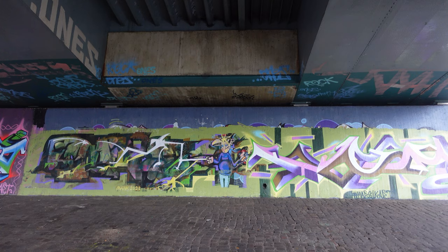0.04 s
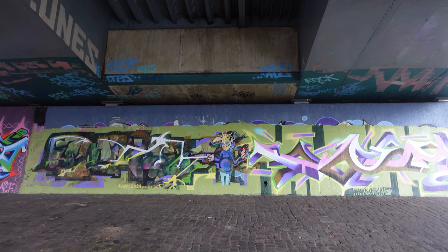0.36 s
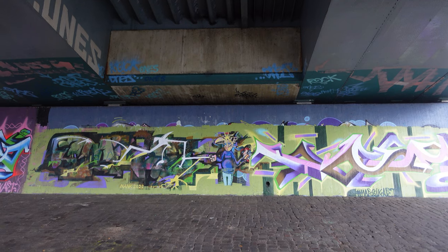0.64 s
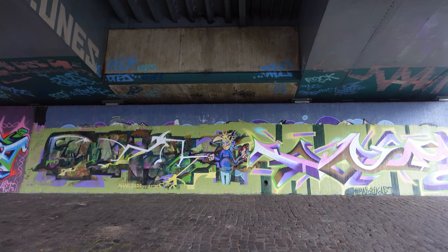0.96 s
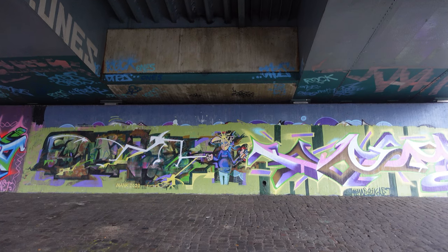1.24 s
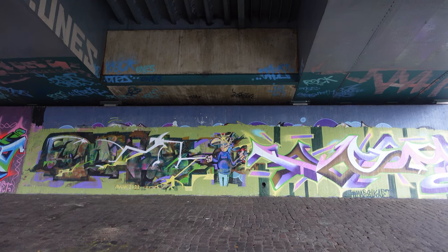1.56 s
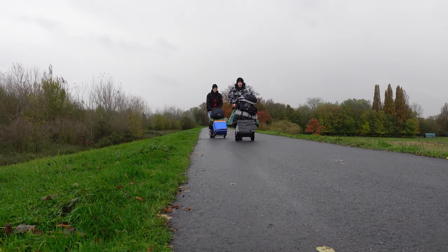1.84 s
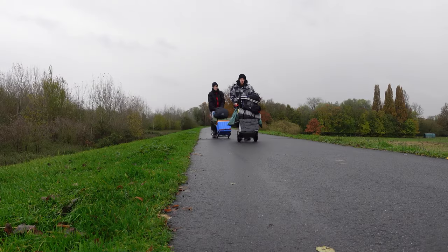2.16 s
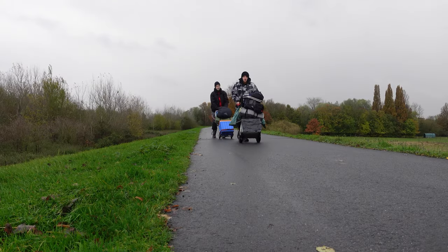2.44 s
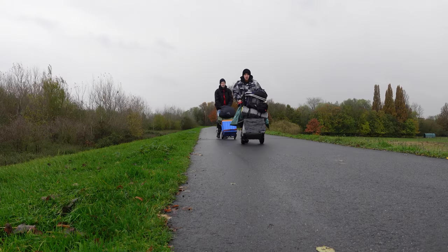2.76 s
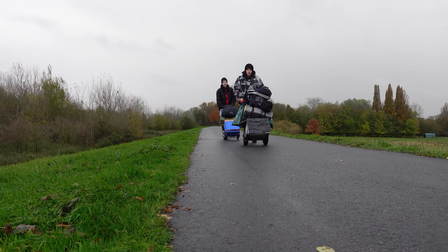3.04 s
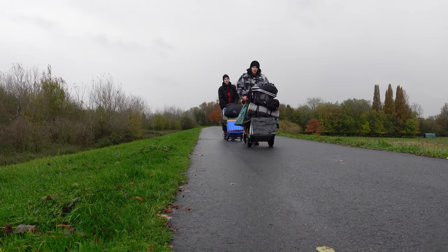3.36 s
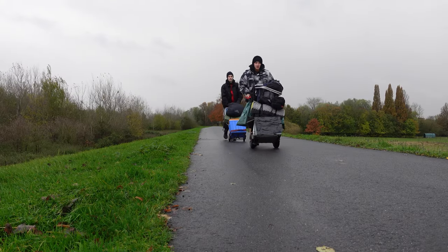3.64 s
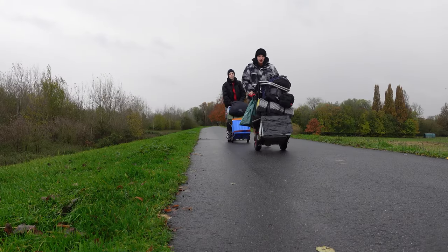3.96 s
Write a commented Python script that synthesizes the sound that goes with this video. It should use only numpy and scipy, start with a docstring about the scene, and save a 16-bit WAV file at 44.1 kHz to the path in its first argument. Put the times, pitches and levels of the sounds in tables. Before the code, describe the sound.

Beneath a road bridge, tyres rumble above and a double thud sets the deck booming, followed by faint high chirps. Then, outdoors and quieter, far traffic hums while rolling carts hiss, crunch grit and rattle once.

```python
"""Under a steel road bridge: tyres roar overhead; axles thud over an expansion joint, which clatters
while the deck booms and rings. A thin high twitter joins in, echoing under the deck.
Cut to an open dyke path: far traffic hums while two loaded carts roll closer. Their wheels hiss
on asphalt, crackle over wet grit and pop single stones; one load rattles once."""
import sys
import numpy as np
from scipy import signal
from scipy.fft import rfft, irfft
from scipy.io import wavfile
from scipy.ndimage import uniform_filter1d, minimum_filter1d

SR = 44100
rng = np.random.default_rng(int(sys.argv[2]) if len(sys.argv) > 2 else 0)


def wrap_up_sound(samples):
    """Save the sound to the file named by the first command line argument, as 16-bit audio."""
    columns = np.atleast_2d(samples).T
    # keep every value between -1 and 1, then stretch to whole-number steps
    tamed = np.clip(columns, -1, 1)
    steps = np.round(tamed * 32767).astype(np.int16)
    wavfile.write(sys.argv[1], SR, steps)


N = 176400
T = np.arange(N) / SR
HZ = np.maximum(np.arange(N // 2 + 1) * SR / N, 1)

# tyre roar, deck rumble over time: t/s, level/dB
ROAR_LEVEL = [(0, -24.5), (.3, -26), (.55, -24), (.78, -23.5), (1.05, -24.5), (1.45, -26), (1.8, -27.5)]
RUMBLE_LEVEL = [(0, -25), (.3, -22), (.58, -25.5), (.7, -21.5), (.9, -26), (1.06, -25), (1.38, -19),
                (1.62, -24.5), (1.8, -20)]
# bridge noise spectra: f/Hz, relative density/dB
ROAR_SPECTRUM = [(210, -40), (350, -9), (490, -1), (1240, -3.5), (1630, -4.5), (2130, -7.5), (2930, -11),
                 (6900, -30.5), (15500, -60.5)]
RUMBLE_SPECTRUM = [(15, -45), (33, -23), (48, -13), (62, -0.5), (100, 4), (150, -0.5), (215, 4.5),
                   (290, -2.5), (400, -7.5), (800, -50), (3000, -100)]
BOOM_SPECTRUM = [(20, -45), (33, -30), (60, -8.5), (100, -7), (150, -7), (185, -0.5), (210, 1.5), (250, -2),
                 (290, -5.5), (330, -4.5), (385, -26), (700, -65), (3000, -100)]
SLAP_SPECTRUM = [(200, -28), (700, 0), (2000, 3.5), (3000, -2.5), (4300, -7), (6500, -15), (10000, -25),
                 (12500, -46), (16000, -50)]
CLATTER_SPECTRUM = [(40, -33), (250, 3), (400, 0), (520, 6.5), (900, 1.5), (1700, 2), (2800, 2.5),
                    (4200, -9), (6500, -17.5), (10000, -30), (12500, -49), (16000, -54)]
RASP_SPECTRUM = [(2000, -38), (3800, -1), (4800, 5), (7500, -14.5), (10000, -17.5), (16000, -42)]
# axles on the joint: t/s, boom/dB, clatter/dB, slap/dB
AXLES = [(-.1, -17.5, -25, -42), (1.106, -15.5, -18.5, -30), (1.236, -16.5, -17.5, -20.5)]
# low swells in the boom: t/s, f/Hz, level/dB
THROBS = [(.024, 220, -12), (0.069, 203.2, -7.5), (1.107, 329.7, -13), (1.149, 251.2, -9.5),
          (1.193, 200, -10.5), (1.275, 245, -12), (1.328, 199, -9), (1.454, 208, -7.5), (1.766, 225, -19.5)]
# ringing steel: f/Hz, relative level/dB
STEEL_MODES = [(202, -9), (311, -8.5), (464, -7), (587, -10.5), (1578, -17), (2304, -19), (2428, -17),
               (2842, -21), (2932, -16.5), (3143, -20), (3543, -23.5)]
# twitter: t/s, length/s, start f/Hz, end f/Hz, level/dB
CHIRPS = [(1.528, .028, 4950, 5000, -34.5), (1.54, 0.017, 4200, 4280, -32.5),
          (1.55, 0.055, 4800, 4700, -33.5), (1.599, 0.06, 4770, 4730, -34.5),
          (1.652, 0.03, 4470, 4280, -34), (1.665, .052, 4750, 4770, -34.5),
          (1.712, 0.023, 4720, 4210, -29.5), (1.74, .048, 5150, 5100, -35.5),
          (1.777, 0.021, 4570, 4200, -32.5)]

# path noise spectra: f/Hz, relative density/dB
HUM_SPECTRUM = [(22, -57), (53, -12.5), (97, -8), (150, -1.5), (253, 0), (333, -5), (608, -8), (717, -3.5),
                (1080, 1), (1280, -4.5), (2600, -9), (4150, -22), (5770, -27), (7590, -34), (9720, -28.5),
                (11500, -33.5), (12800, -45), (15500, -48)]
ROLL_SPECTRUM = [(300, -36), (1400, 2), (2100, -0.5), (3300, -2), (4300, -17.5), (7000, -35), (14000, -60)]
GRIT_SPECTRUM = [(200, -50), (1500, -16), (3200, 9), (4300, 2.5), (5700, 1.5), (7800, -6), (9900, -2),
                 (11300, -13), (12600, -29), (16000, -33)]
KNOCK_SPECTRUM = [(100, -50), (900, -24), (2000, -7), (2900, 7), (4300, 0), (5600, -4.5), (7500, -15.5),
                  (10000, -16), (12500, -49)]
# wheel hiss, fine crackle over time: t/s, level/dB
ROLL_LEVEL = [(1.82, -44), (2.2, -36.5), (2.55, -41), (2.95, -49), (3.4, -50), (4, -42)]
CRACKLE_LEVEL = [(1.82, -54), (2.3, -49.5), (2.6, -49.5), (3.3, -47.5), (4, -43)]
# grit crunches: t/s, length/s, level/dB, high minus low band/dB
CRUNCHES = [(1.869, .0087, -40.5, -1), (2.121, .021, -41, 8), (2.241, 0.036, -40, 5),
            (2.343, 0.026, -42.5, 5), (2.751, 0.0072, -35, -5), (2.783, 0.0075, -40, -8),
            (2.806, 0.045, -43.5, -10), (3.175, 0.014, -37, 4), (3.183, .013, -37, -1),
            (3.193, .036, -43, 0), (3.274, .042, -41.5, 4), (3.619, 0.013, -40, -1), (3.661, .018, -37, -3),
            (3.76, .012, -38.5, 2), (3.792, 0.0083, -37, 5)]
# stone pops: t/s, level/dB
STONE_POPS = [(1.905, -34), (1.913, -35), (1.93, -38), (2.247, -31.5), (2.366, -35), (2.708, -32),
              (2.821, -31), (3.096, -30.5), (3.213, -29), (3.499, -28.5)]
# knocks of the load: t/s, level/dB, T60/s
LOAD_KNOCKS = [(3.881, -23.5, .035), (3.893, -22, 0.031), (3.8982, -21.5, 0.028), (3.907, -23, 0.028),
               (3.914, -19.5, 0.01)]

# stereo widths: f/Hz, side minus mid/dB
BRIDGE_WIDTH = [(60, -39), (180, -24.5), (550, -17), (1650, -14), (4970, -7), (15000, -14)]
JOINT_WIDTH = [(400, -18), (2500, -18), (4500, -12), (10000, -28)]
PATH_WIDTH = [(60, -21), (180, -34), (550, -16), (1650, -19), (4970, -12), (15000, -23)]
CART_WIDTH = [(2500, -30), (5500, -16), (10000, -26)]


def amp(db):
    """Decibels to gain."""
    return 10 ** (np.asarray(db) / 20)


def unit_rms(x):
    """Scale to unit power."""
    return x / np.sqrt(np.mean(x ** 2) + 1e-20)


def level(points):
    """Gain over time from t/s, level/dB."""
    return amp(np.interp(T, *np.transpose(points)))


def gains(points):
    """Gain over frequency from f/Hz, level/dB."""
    hz, db = np.transpose(points)
    return amp(np.interp(np.log(HZ), np.log(hz), db))


def noise(shape, width):
    """Unit-power stereo noise of given spectral shape and width."""
    mid, side = rfft(rng.standard_normal((2, N))) * shape
    side = side * gains(width)
    return unit_rms(irfft(np.array([mid + side, mid - side]), N))


def tone(hz):
    """Sine at random phase."""
    return np.sin(2 * np.pi * (hz * T + rng.random()))


def resonance(hz, half_width_hz):
    """Gain over frequency of one peak."""
    return 1 / (1 + ((HZ - hz) / half_width_hz) ** 2)


def strike(start_s, rise_s, t60_s, hold_s=0):
    """Envelope: linear rise, hold, exponential decay."""
    age_s = T - start_s
    decay_s = np.maximum(age_s - rise_s - hold_s, 0)
    return np.clip(age_s / rise_s, 0, 1) * amp(-60 * decay_s / t60_s)


def swell(start_s, length_s):
    """Short rounded envelope."""
    progress = np.clip((T - start_s) / length_s, 0, 1)
    return 2 * np.sqrt(progress * (1 - progress))


def grains(per_s, spread_db):
    """Random impulses, mostly small, a few large; unit power."""
    sizes = amp(spread_db * np.minimum(rng.exponential(1, N), 4)) * rng.choice([-1, 1], N)
    return unit_rms(sizes * (rng.random(N) < per_s / SR))


def pan(left_minus_right_db):
    """Left and right gains."""
    return amp(np.array([[1], [-1]]) * left_minus_right_db / 2)


def overhead_traffic():
    """Tyre roar and the rumble it drives in the deck."""
    roar = level(ROAR_LEVEL) * noise(gains(ROAR_SPECTRUM), BRIDGE_WIDTH)
    rumble = level(RUMBLE_LEVEL) * noise(gains(RUMBLE_SPECTRUM), BRIDGE_WIDTH)
    return roar + rumble


def deck_boom(rise_s=0.019, lead_s=0.022):
    """Axles set the deck's crowded low modes booming and throbbing; the thud leads the clatter."""
    power = sum((amp(db) * strike(t - lead_s, rise_s, t60_s=1.87, hold_s=0.12)) ** 2
                for t, db, _, _ in AXLES)
    boom = np.sqrt(power) * noise(gains(BOOM_SPECTRUM), BRIDGE_WIDTH)
    throbs = sum(amp(db) * swell(t, length_s=0.039) ** 2 * tone(hz) for t, hz, db in THROBS)
    return boom + throbs


def steel_ring(gain_db=-2.5):
    """Each axle rings a few steel modes, in proportion to its boom."""
    out = 0
    for t, boom_db, _, _ in AXLES:
        modes = sum(amp(db) * tone(hz) for hz, db in STEEL_MODES)
        out = out + amp(boom_db + gain_db) * strike(t, rise_s=0.019, t60_s=1.32) * modes
    return out


def joint_clatter(t60_1khz_s=0.88, t60_exponent=-0.16):
    """Bright slap of tyre on steel, then the joint's clatter, smeared by the concrete vault."""
    slaps = sum(amp(db) * strike(t, rise_s=0.014, t60_s=0.26, hold_s=0.012) for t, _, _, db in AXLES)
    out = slaps * noise(gains(SLAP_SPECTRUM), JOINT_WIDTH)
    clatter_bins = rfft(noise(gains(CLATTER_SPECTRUM), JOINT_WIDTH))
    for octave in range(-3, 5):
        band = np.clip(1 - abs(np.log2(HZ / 1000) - octave), 0, 1)
        t60_s = t60_1khz_s * 2 ** (t60_exponent * octave)   # treble dies first
        power = sum((amp(db) * strike(t, rise_s=0.027, t60_s=t60_s, hold_s=0.023)) ** 2
                    for t, _, db, _ in AXLES)
        out = out + np.sqrt(power) * irfft(clatter_bins * band, N)
    return out


def twitter(wobble_rms_hz=110, rasp_db=-8.5, echo_db=0.5):
    """Short wavering glides, probably a small bird, echoing under the deck."""
    rasp = amp(rasp_db) * noise(gains(RASP_SPECTRUM), BRIDGE_WIDTH)
    direct = 0
    for t, length_s, start_hz, end_hz, db in CHIRPS:
        wobble_bins = rfft(rng.standard_normal(N)) * resonance(0, half_width_hz=380)
        glide_hz = np.interp(T, [t, t + length_s], [start_hz, end_hz])
        hz = glide_hz + wobble_rms_hz * unit_rms(irfft(wobble_bins, N))
        whistle = np.sin(2 * np.pi * np.cumsum(hz) / SR)
        direct = direct + amp(db) * swell(t, length_s) * (whistle + rasp)
    vault = rng.standard_normal((2, SR // 2)) * strike(0, rise_s=0.011, t60_s=0.55)[:SR // 2]
    vault = vault / np.sqrt(np.sum(vault ** 2, axis=1, keepdims=True))
    return direct + amp(echo_db) * signal.fftconvolve(direct, vault, axes=1)[:, :N]


def far_traffic(level_db=-30.5, shelf_hz=5150, shelf_db=-9):
    """Even hum, dulled by distance."""
    dulling = amp(shelf_db * HZ ** 4 / (HZ ** 4 + shelf_hz ** 4))
    return amp(level_db) * noise(gains(HUM_SPECTRUM) * dulling, PATH_WIDTH)


def wheel_hiss():
    """Cart wheels rolling on asphalt."""
    return level(ROLL_LEVEL) * noise(gains(ROLL_SPECTRUM), PATH_WIDTH)


def grit_crackle(pitches_hz=(3170, 5780, 7650, 9740)):
    """Fine grains snap steadily under the wheels, at pitches of their own."""
    snap_bins = sum(rfft(grains(per_s=300, spread_db=3.4)) * resonance(hz, half_width_hz=1100)
                    for hz in pitches_hz)
    return level(CRACKLE_LEVEL) * unit_rms(irfft(snap_bins * gains(GRIT_SPECTRUM), N))


def grit_crunches(scatter_db=-14, split_hz=7200):
    """Wheels crush grit in short dense bursts, dull or bright."""
    snaps = grains(per_s=3500, spread_db=5)
    scatter = amp(scatter_db) * rng.standard_normal((2, N))   # arrives from the sides
    colour = unit_rms(gains(GRIT_SPECTRUM))
    low_band = 1 / (1 + (HZ / split_hz) ** 8)
    out = 0
    for band, tilt in ((low_band, -0.5), (1 - low_band, 0.5)):
        bursts = sum(amp(db + tilt * bright_db) * swell(t, length_s)
                     for t, length_s, db, bright_db in CRUNCHES)
        out = out + irfft(rfft(bursts * (snaps + scatter)) * colour * band, N)
    return out


def stone_pops():
    """Single larger stones pop from under the wheels."""
    pops = sum(amp(db) * strike(t, rise_s=0.00055, t60_s=0.014) for t, db in STONE_POPS)
    return pops * noise(gains(GRIT_SPECTRUM), CART_WIDTH)


def load_rattle():
    """Quick run of dry knocks from a cart's load."""
    knocks = sum(amp(db) * strike(t, rise_s=0.00055, t60_s=t60_s) for t, db, t60_s in LOAD_KNOCKS)
    return knocks * noise(gains(KNOCK_SPECTRUM), CART_WIDTH)


def scene(cut_s=1.815, fade_s=0.021):
    """Bridge, then a quick equal-power crossfade to the path."""
    bridge = overhead_traffic() + deck_boom() + steel_ring() + joint_clatter() + twitter()
    path = far_traffic() + grit_crackle() + grit_crunches() + wheel_hiss() + stone_pops() + load_rattle()
    path_share = np.clip((T - cut_s) / fade_s + 0.5, 0, 1)
    return np.sqrt(1 - path_share) * pan(-0.75) * bridge + np.sqrt(path_share) * pan(-1.7) * path


def record(dry, low_cut_hz=33, ceiling=0.93, smooth_s=0.008, stopband_hz=15900):
    """High-pass, peak limiter, steep low-pass."""
    x = signal.sosfilt(signal.butter(4, low_cut_hz, "high", fs=SR, output="sos"), dry)
    window = int(smooth_s * SR)
    limiter_gain = ceiling / np.maximum(abs(x).max(axis=0), ceiling)
    x = x * uniform_filter1d(minimum_filter1d(limiter_gain, 2 * window), window)
    return signal.sosfilt(signal.cheby2(16, 60, stopband_hz, fs=SR, output="sos"), x)


dry = scene()
out = record(dry)
wrap_up_sound(out)
```